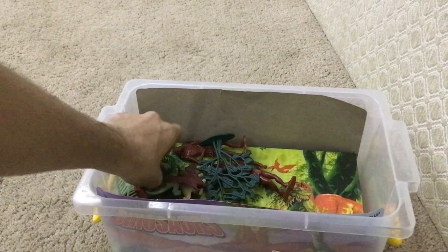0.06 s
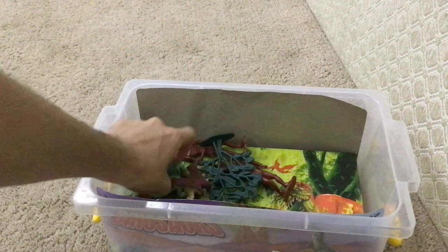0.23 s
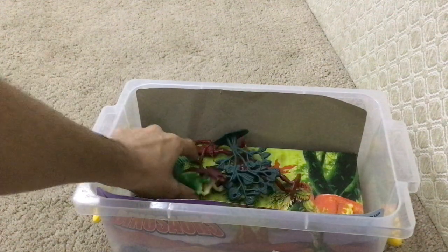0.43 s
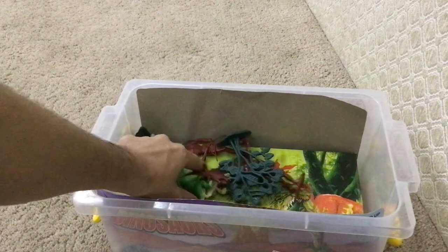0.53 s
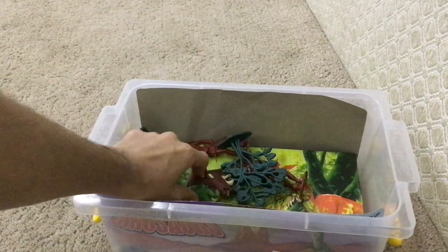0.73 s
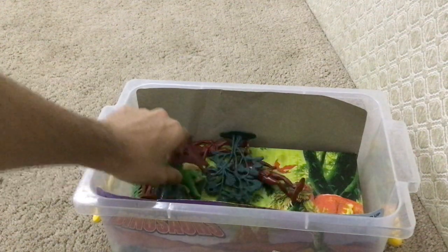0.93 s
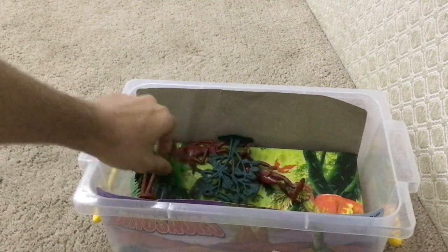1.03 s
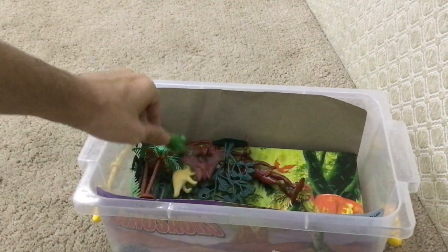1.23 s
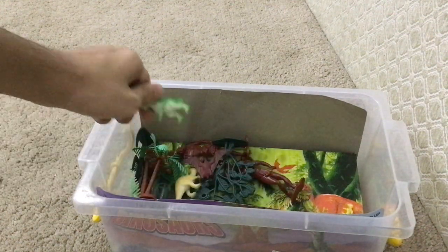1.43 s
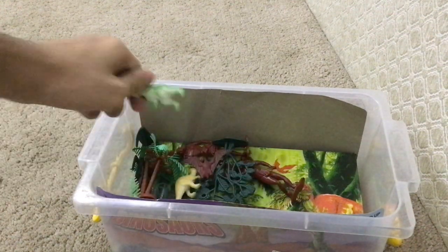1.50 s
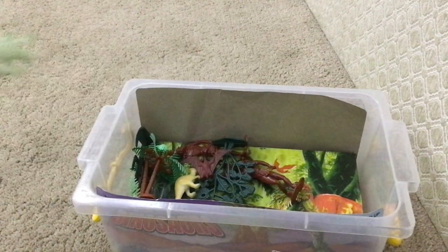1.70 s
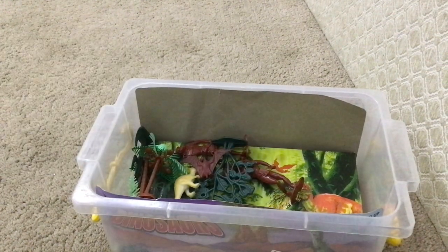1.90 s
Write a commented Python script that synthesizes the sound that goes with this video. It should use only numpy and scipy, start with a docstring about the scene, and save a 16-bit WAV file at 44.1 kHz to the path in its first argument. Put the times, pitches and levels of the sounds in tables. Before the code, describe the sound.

Plastic toys rattle in a hollow plastic bin as a hand rummages. Light shuffling and a faint leafy rustle open; knocks thicken from 0.2 s into a dense clatter around 0.3-0.55 s. Sparse, softer taps and ticks follow until a hard double clatter at 1.19-1.25 s. Small drops click at 1.31 and 1.4 s with a faint thin ring, then quiet room rumble and slight hiss remain.

```python
"""Toys knock a hollow plastic bin on a carpet as a hand rummages in it and lifts one out.
Each knock is a sum of decaying bin modes; toys tick on each other as noise bursts with a short ring.
A thin toy drops back with a faint, fluttering two-mode ring; the hand's shuffle is many random bumps
and grains. A filtered-noise rustle dies away, and a quiet room adds a dark tail, rumble and hiss."""
import sys
import numpy as np
from scipy import signal
from scipy.fft import rfft, irfft
from scipy.io import wavfile
from scipy.ndimage import uniform_filter1d

SR = 44100
rng = np.random.default_rng(int(sys.argv[2]) if len(sys.argv) > 2 else 0)


def linear_from_db(decibels):
    """Turn decibels (scalar or array-like) into linear amplitude factors; 0 gives 1."""
    return 10 ** (np.asarray(decibels, float) / 20)


def wav_out(sig):
    """Save sig, one row per channel (or a flat mono array), as 16-bit PCM at SR to the path in sys.argv[1]."""
    wavfile.write(sys.argv[1], SR, np.round(np.clip(np.atleast_2d(sig).T, -1, 1) * 32767).astype(np.int16))


N = 85995  # length in samples


def evened(x):
    """Normalisation: scales x to unit rms."""
    return x / np.sqrt(np.mean(x ** 2) + 1e-20)


def add(mix, start_s, sound):
    """Superposition: adds a sound into the mix at its start time."""
    part = mix[max(round(start_s * SR), 0):][:len(sound)]
    part += sound[:len(part)]


def coloured(x, points):
    """Spectral shaping: weights x by a curve through (Hz, dB) points, interpolated over log frequency."""
    f, db = np.transpose(points)
    hz = np.fft.rfftfreq(len(x), 1 / SR)
    gain = linear_from_db(np.interp(np.log(hz + 1), np.log(f + 1), db))
    return irfft(rfft(x) * gain, len(x))


def ringing(modes, length=0.4, stretch=1):
    """Modal decomposition: one decaying sine per mode, neighbours in opposite sign."""
    t = np.arange(0, length, 1 / SR)
    hz, db, t60 = np.transpose(modes)[:, :, None]
    sign = (-1.0) ** np.arange(len(modes))[:, None]
    decay = linear_from_db(db - 60 * t / np.maximum(t60, 0.005))
    return sign * decay * np.sin(2 * np.pi * hz * stretch * t)


def clicks(per_s, spread_db):
    """Random impulse train: sparse clicks of random sign, a few of them large."""
    size = linear_from_db(spread_db * np.minimum(rng.exponential(1, N), 4))
    present = rng.random(N) < per_s / SR
    return size * present * rng.choice([-1, 1], N)


# Modes of the bin's walls and air, before detuning and added damping.
# Each row: frequency in Hz, level in dB, decay time t60 in seconds.
BIN_MODES = [(154.5, -8, 0.14), (180.8, -7, 0.12), (274.3, -5, 0.082), (345, -1.5, 0.11), (427, -1, 0.085),
             (533, 0, 0.09), (634.4, 0.5, 0.11), (775, -18, 0.15), (963, -14.5, .09), (1111.5, -7.5, 0.042),
             (1307, -19, .06), (1446, -24.5, 0.037)]
# Knocks of toys on the bin. Each row: time in seconds, strength in dB, pitch of the best-rung modes in Hz,
# hardness in dB added to the modes above HARD_HZ.
KNOCKS = [(0.008, -28.5, 503, -13), (0.039, -38.5, 549, -11.5), (0.179, -36.5, 690, 3),
          (0.199, -25, 633, 7), (0.277, -39, 598, 5.5), (0.288, -24.5, 575, -5), (0.298, -22.5, 570, -3),
          (0.304, -22.5, 638, -11.5), (0.33, -26, 608, 5), (0.354, -39.5, 620, 10),
          (0.361, -25, 647, -10.5), (0.368, -15, 500, 8.5), (0.378, -16.5, 460, -15.5),
          (0.389, -21.5, 580, 1), (0.4, -21, 593, 6.5), (0.409, -29.5, 610, -12), (0.422, -39.5, 380, 5),
          (0.448, -35.5, 530, -1), (0.46, -31, 340, 1.5), (0.472, -29, 600, 4), (0.504, -27.5, 644, -5),
          (0.515, -27, 660, 0), (0.537, -32, 620, 22.5), (0.568, -25.5, 685, 8), (0.61, -34.5, 533, -17),
          (0.652, -36.5, 330, 8), (0.694, -39, 576, 4.5), (0.763, -34.5, 554, 7), (0.782, -25.5, 420, 3),
          (0.863, -39.5, 272, -6), (0.941, -35.5, 260, -13), (0.965, -34, 345, -6), (1.052, -36, 346, 4.5),
          (1.086, -40, 650, 3.5), (1.1857, -15, 582, 5), (1.193, -22, 660, -6.5), (1.2125, -15, 580, 4.5),
          (1.223, -19, 615, -6), (1.245, -34.5, 525, 5), (1.262, -37.5, 610, -6.5), (1.312, -25.5, 400, 6),
          (1.327, -26, 438, 2.5), (1.398, -25.5, 500, 2.5), (1.41, -33.5, 580, 6)]
HARD_HZ = 870
SPOT_OCTAVES, FAR_DB = 0.63, 6.5  # reach of a knock over the modes; most that a far mode loses
SPOT_DB, DETUNE = 2.5, 0.008  # chance spread of level (dB) and of relative pitch, per mode
SWELL_S, SWELL_REF_DB, SOFTER = 0.003, -14, 0.3  # swell at the reference strength; dB of lengthening per dB weaker
EARLY_T60, LATE_DB = 0.028, -3.5  # quick extra damping (s) by resting toys; level of the undamped part


def knocks():
    """Modal excitation: a blow swells into the modes near its pitch; the loaded walls shift each time."""
    out = np.zeros(N)
    hz, t = np.array(BIN_MODES)[:, 0], np.arange(0, 0.4, 1 / SR)
    damping = linear_from_db(-60 * t / EARLY_T60) + linear_from_db(LATE_DB)
    chance = rng.standard_normal((len(KNOCKS), 2, len(BIN_MODES)))
    for (start_s, db, best_hz, hard_db), (chance_level, chance_pitch) in zip(KNOCKS, chance):
        octaves_away = abs(np.log2(np.minimum(hz, HARD_HZ) / best_hz))
        far_loss_db = np.minimum(6 * (octaves_away / SPOT_OCTAVES) ** 2, FAR_DB)
        weight = linear_from_db(SPOT_DB * chance_level - far_loss_db + hard_db * (hz > HARD_HZ))
        modes = ringing(BIN_MODES, stretch=1 + DETUNE * chance_pitch[:, None])
        # weaker blows stay longer in contact
        swell_s = SWELL_S * linear_from_db(SOFTER * (SWELL_REF_DB - db))
        swell = np.sin(np.pi / 2 * np.minimum(t / swell_s, 1)) ** 2
        sound = swell * damping * (weight @ modes)
        early_level = 2 * np.std(sound[:SR // 70])
        # an early start makes long and short swells peak together
        add(out, start_s + SWELL_S - swell_s, linear_from_db(db) * sound / early_level)
    return out


# Noise spectrum of toy on toy. Each row: frequency in Hz, relative density in dB per Hz.
SCRATCH = [(600, 2.5), (1150, 9), (1450, 8), (1950, -7.5), (2450, 0.5), (3100, 0.5), (4300, -7),
           (7000, -16), (16000, -32)]
# Contacts between toys. Each row: start in seconds, relative strength in dB, upper ring frequency in Hz,
# brightness in dB per octave, scratch length in seconds.
TICKS = [(0.0074, -53, 2300, -3, 0.0067), (0.125, -53, 2330, -5, 0.018), (0.145, -53.5, 3160, 14, 0.0088),
         (0.177, -44, 2460, -7, 0.005), (0.2, -33.5, 2410, -10, 0.0049), (0.2873, -38.5, 2400, 2, 0.0011),
         (0.3004, -33.5, 2490, -8, 0.019), (0.3276, -40, 2410, 0.5, 0.0052), (0.354, -34, 2400, 6, 0.0088),
         (0.3682, -26, 2590, 0, 0.0019), (0.376, -32, 2780, -4.5, 0.0084), (0.405, -34, 2930, -7, 0.008),
         (0.389, -38.5, 2900, -3, 0.006), (0.422, -37, 2930, -6, 0.025), (0.485, -42.5, 2670, -12, 0.0037),
         (0.534, -32, 4350, 3.5, 0.0022), (0.545, -33, 3140, -3.5, 0.0029), (0.5667, -30, 3040, -3, 0.007),
         (0.634, -46, 4500, 5.5, 0.015), (0.648, -47, 2990, -7, 0.0064), (0.763, -41.5, 2370, -0.5, 0.0026),
         (0.7802, -37.5, 2460, -1.5, 0.0041), (0.822, -46.5, 2510, -12, 0.0031),
         (0.9007, -49, 2630, 5, 0.0043), (0.9306, -32, 2570, -3, 0.00072),
         (0.9633, -43.5, 2440, -3.5, 0.0052), (0.991, -43.5, 2500, -10.5, 0.0038),
         (1.047, -46, 2240, -17, 0.0036), (1.072, -50, 2950, -1.5, 0.01),
         (1.142, -48.5, 2310, -3.5, 0.0053), (1.1856, -29.5, 2170, -3, 0.0064),
         (1.1895, -28, 2140, -4.5, 0.0039), (1.213, -32.5, 2350, -1, 0.0046),
         (1.222, -32, 2160, -7.5, 0.011), (1.246, -31, 2120, -18.5, 0.0098), (1.28, -53, 2130, 4, 0.0029),
         (1.3119, -33.5, 2160, 2, 0.0021), (1.3206, -34, 3060, -6.5, 0.023),
         (1.394, -41.5, 2620, -4.5, 0.0091), (1.41, -38.5, 3190, -9, 0.0051)]
RING_DB, RING_T60, LOW_RING = 4, 0.016, 0.545  # ring level, decay (s), lower mode as a share of the upper
CLEAN_S = 0.004  # contacts shorter than this ring cleaner
SNAP_DB, SNAP_S = -13, 0.0005  # first snap before brightness is added; its decay constant
TAIL_DB, TAIL_S = 0.5, 0.0086  # tail of the noise; its decay constant


def ticks():
    """Broadband contact noise: a tilted burst with a first snap, a short two-note ring and a tail."""
    out, t = np.zeros(N), np.arange(2048) / SR
    hz = np.fft.rfftfreq(2048, 1 / SR) + 1
    octaves = np.log2(np.minimum(hz, 9000) / 3000 + 0.79)  # levels off at both ends
    for (start_s, db, ring_hz, tilt_db, length), noise in zip(TICKS, rng.standard_normal((len(TICKS), 2048))):
        shape = np.exp(-(t / max(length, 0.0005)) ** 2) + linear_from_db(TAIL_DB) * np.exp(-t / TAIL_S)
        hiss = irfft(rfft(coloured(noise, SCRATCH)) * linear_from_db(tilt_db * octaves))
        snap = linear_from_db(SNAP_DB + tilt_db) * np.diff(noise, prepend=0) * np.exp(-t / SNAP_S)
        notes = np.sin(2 * np.pi * np.outer([1, LOW_RING], ring_hz * t)).sum(0)
        cleanness = np.sqrt(CLEAN_S / max(length, 0.001))
        ring = linear_from_db(RING_DB - 60 * t / RING_T60) * cleanness * notes
        onset = np.minimum(t / 0.0011, 1)
        add(out, start_s, linear_from_db(db - 11.5) * (onset * (evened(hiss) * shape + ring) + snap))
    return out


# Modes of the thin toy that drops back. Each row: frequency in Hz, level in dB, decay time t60 in seconds.
THIN_MODES = [(1658, 0, .8), (3050, 0, .25)]
# Blows of that toy. Each row: start in seconds, level in dB.
THIN_BLOWS = [(1.313, -60), (1.405, -63)]


def thin_toy():
    """Light damping and amplitude modulation: two faint long modes that flutter as the toy rocks."""
    out = np.zeros(N)
    sound = ringing(THIN_MODES, length=0.34).sum(0)
    for start_s, db in THIN_BLOWS:
        add(out, start_s, linear_from_db(db) * sound)
    flutter = evened(uniform_filter1d(rng.standard_normal(N), size=300))
    return out * (1 + 0.6 * flutter)


# How busy the hand is. Each row: time in seconds, bump level in dB, scratch level in dB.
STIR = [(0, -40.5, -52), (0.068, -49.5, -80), (.16, -56.5, -78.5), (.27, -52.5, -71), (0.398, -27, -50.5),
        (0.449, -44, -64), (0.559, -33.5, -55.5), (.62, -50, -62), (.74, -53.5, -63.5),
        (0.849, -52.5, -66.5), (.98, -42.5, -63), (1.04, -54, -73), (1.169, -47.5, -65.5),
        (1.238, -29.5, -62.5), (1.3, -44, -64), (1.451, -49.5, -80), (1.551, -61.5, -97.5)]


def control(column):
    """Linear interpolation: one curve of the hand's activity at every sample."""
    rows = np.array(STIR)
    return np.interp(np.arange(N) / SR, rows[:, 0], rows[:, column])


def shuffle():
    """Stochastic excitation: random bumps ring the bin while tiny grains scratch, both led by the hand."""
    t = np.arange(0, 0.4, 1 / SR)
    # the hand's weight shortens the ring of small bumps
    damped_modes = ringing(BIN_MODES) * linear_from_db(-60 * t / 0.15)
    # each mode has its own 120 bumps per second
    bumps = sum(signal.fftconvolve(clicks(120, 3.96), mode)[:N] for mode in damped_modes)
    grain_decay = np.exp(-np.arange(400) / (0.0017 * SR))
    grit = signal.fftconvolve(abs(clicks(1800, 2.7)), grain_decay)[:N]
    grains = coloured((grit + 0.28) * rng.standard_normal(N), SCRATCH)
    # a short fade-out follows the last row
    fade = np.clip((STIR[-1][0] + 0.18 - np.arange(N) / SR) / 0.14, 0, 1)
    return fade * (linear_from_db(control(1)) * evened(bumps) + linear_from_db(control(2)) * evened(grains))


def rustle():
    """Band-limited noise: a bright brush of plastic leaves that dies away from the start."""
    start_db, t60 = -67.5, 0.5
    brush = clicks(2500, 2.5) + 0.3 * rng.standard_normal(N)
    band = signal.butter(2, [3800, 7200], "band", fs=SR, output="sos")
    decay = linear_from_db(start_db - 60 * np.arange(N) / SR / t60)
    return decay * evened(signal.sosfilt(band, brush))


def room(x):
    """Diffuse reverberation: a soft carpeted room as a short dark tail of scattered echoes."""
    level_db, t60 = -22.5, 0.25
    t = np.arange(SR // 2) / SR
    build_up = np.clip((t - 0.004) / 0.024, 0, 1)
    tail = rng.standard_normal(len(t)) * linear_from_db(-60 * t / t60) * build_up
    tail = signal.lfilter([1], [1, -0.6], tail)  # darkens the echoes
    return linear_from_db(level_db) * signal.fftconvolve(x, tail / np.linalg.norm(tail))[:N]


# Background spectrum. Each row: frequency in Hz, relative density in dB per Hz.
HUSH = [(21, -38.5), (36, -19.5), (79, -9.5), (108, -13), (139, -15), (220, -23), (284, -29.5),
        (358, -36.5), (581, -34.5), (769, -44), (16000, -64.5)]
HUSH_DB = -54  # rms level


def hush():
    """Stationary coloured noise: low rumble of the house and microphone hiss."""
    return linear_from_db(HUSH_DB) * evened(coloured(rng.standard_normal(N), HUSH))


def scene():
    """Superposition of the toys, their reverberation and the background."""
    toys = knocks() + ticks() + thin_toy() + shuffle() + rustle()
    # small walls radiate no deep bass
    toys = signal.sosfilt(signal.butter(4, 120, "high", fs=SR, output="sos"), toys)
    return (toys + room(toys) + hush())[None]


def roll_off(x):
    """The treble ends steeply here."""
    return signal.sosfilt(signal.butter(12, 16440, fs=SR, output="sos"), x)


def record(dry):
    """Band limitation: a steep low-pass at 16150 Hz and a high-pass at 44 Hz."""
    low_pass = signal.firwin(511, 16150, window=("kaiser", 9), fs=SR)
    x = signal.oaconvolve(dry, low_pass[None], "same")
    x = signal.sosfilt(signal.butter(5, 44, "high", fs=SR, output="sos"), x)
    return roll_off(x)


dry = scene()
out = record(dry)
wav_out(out)
```